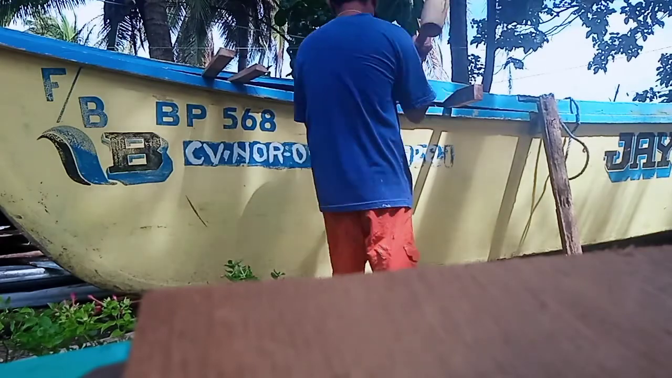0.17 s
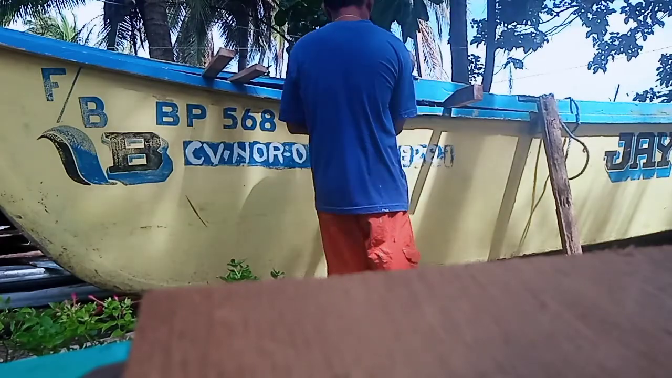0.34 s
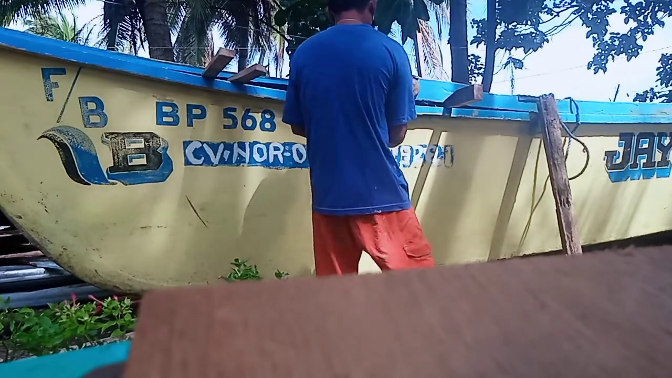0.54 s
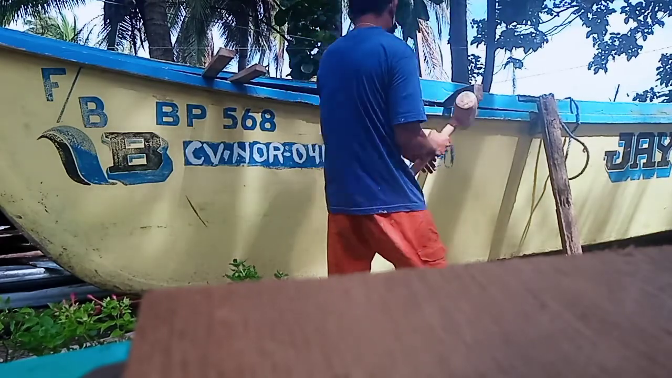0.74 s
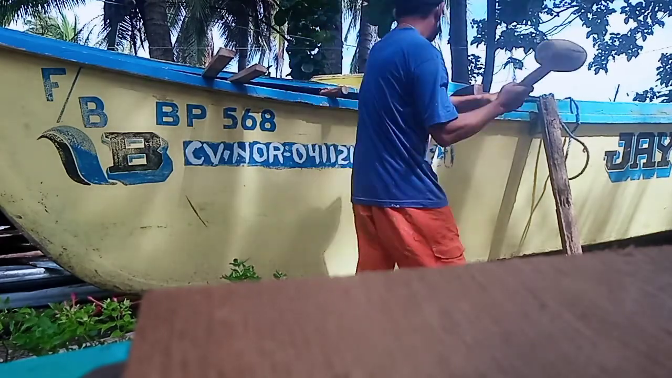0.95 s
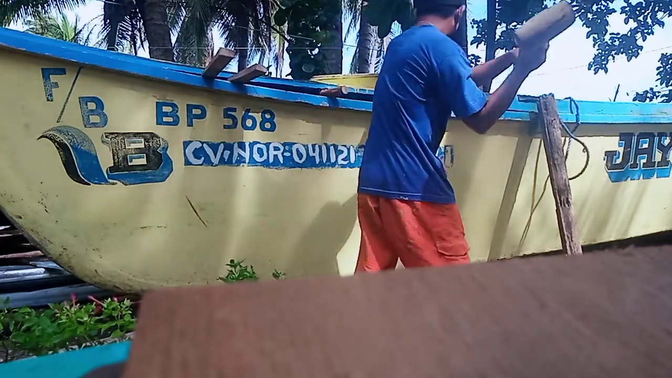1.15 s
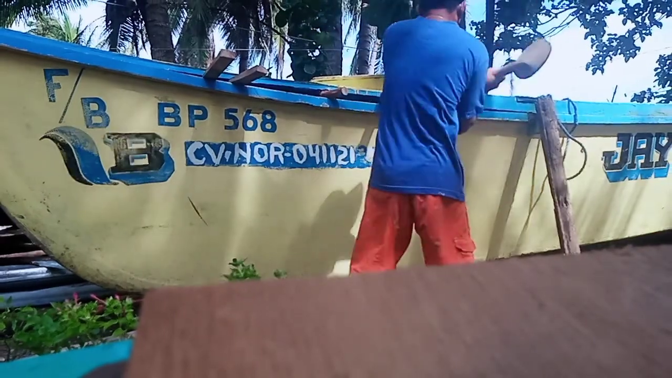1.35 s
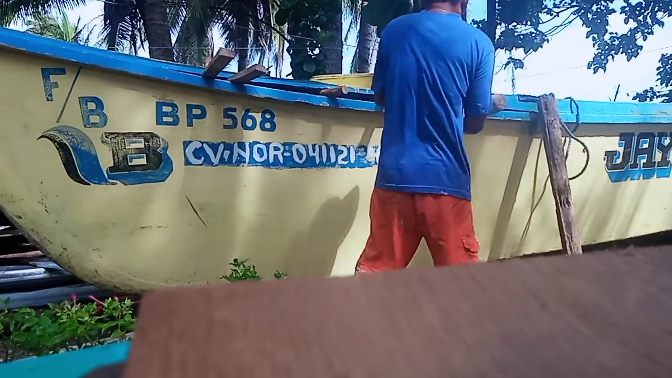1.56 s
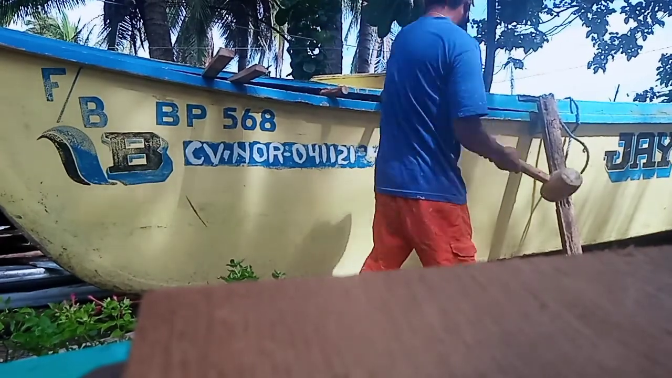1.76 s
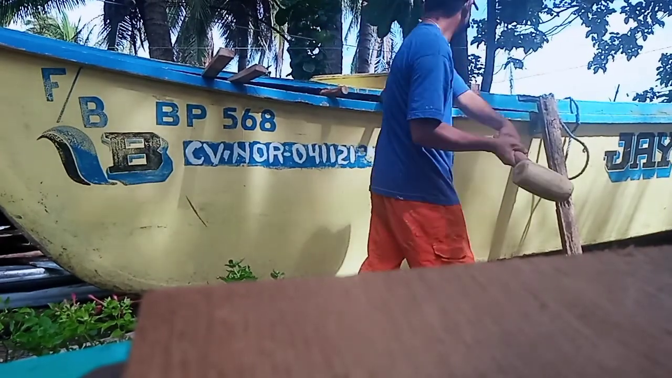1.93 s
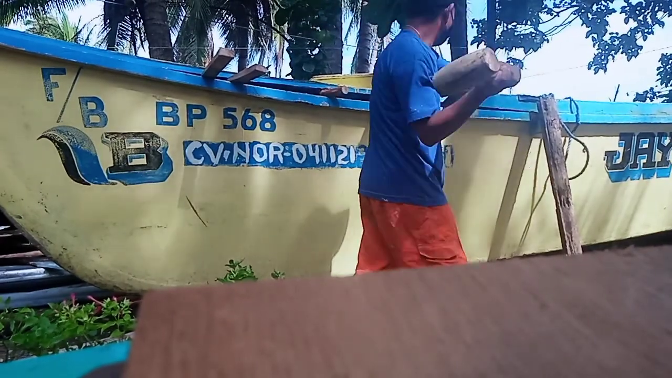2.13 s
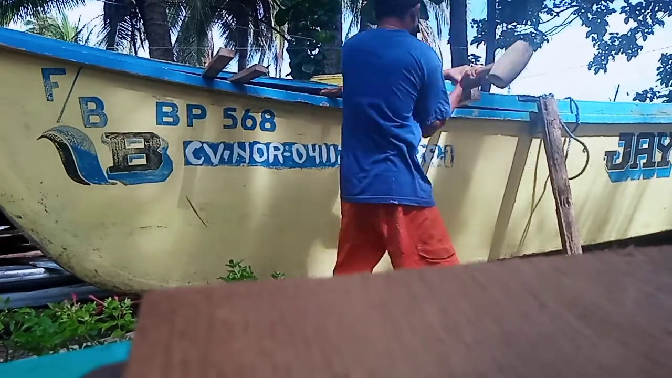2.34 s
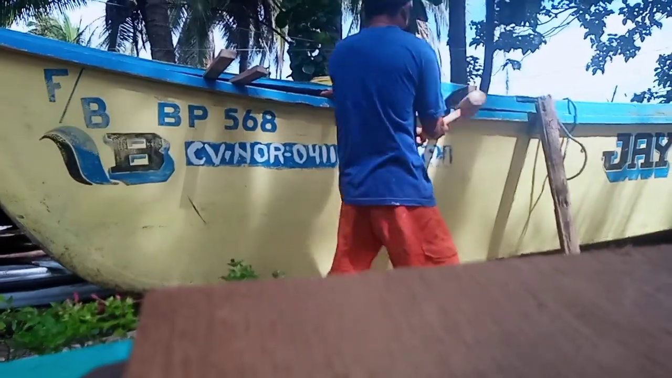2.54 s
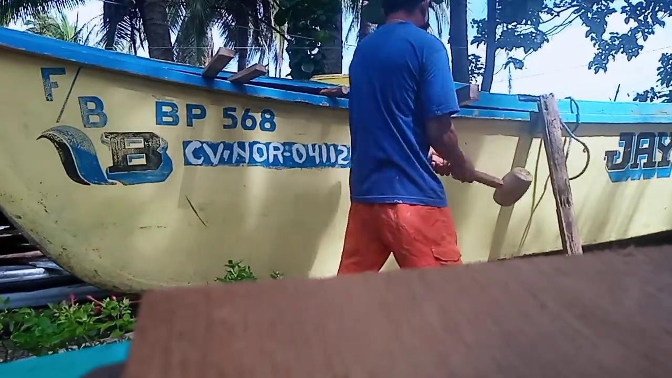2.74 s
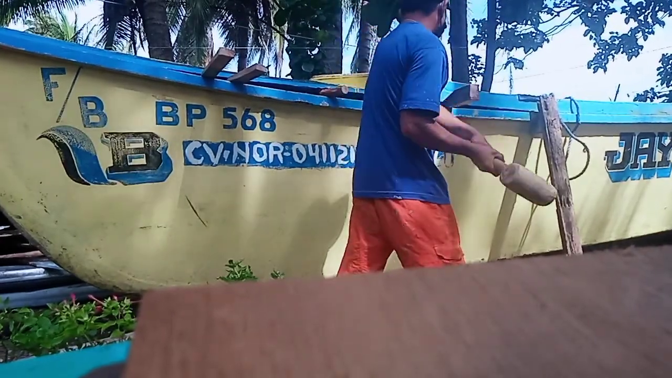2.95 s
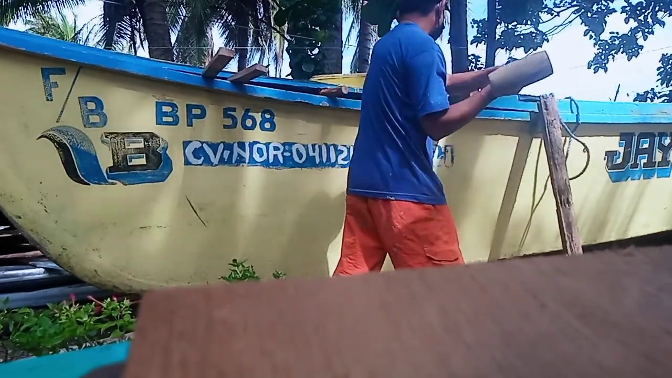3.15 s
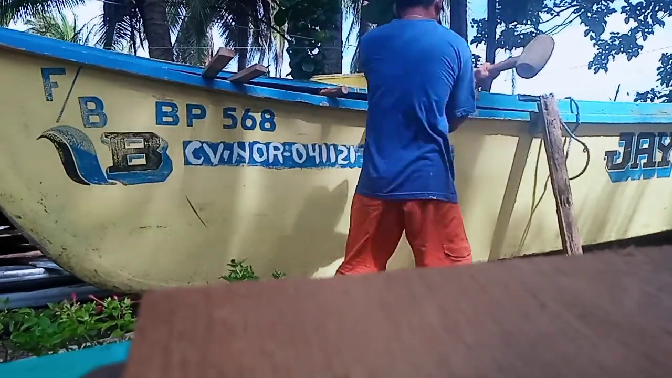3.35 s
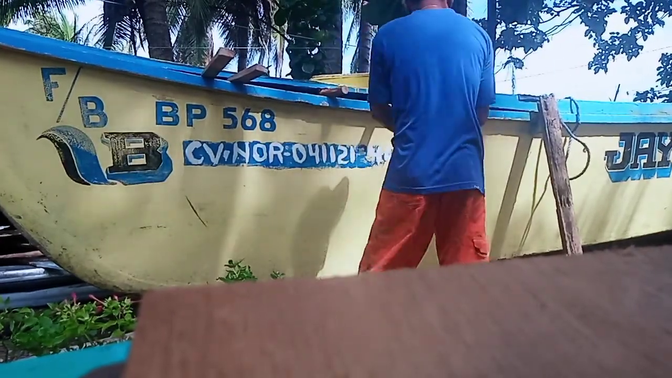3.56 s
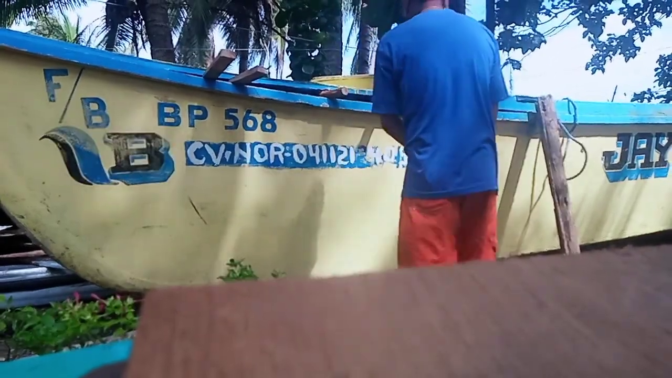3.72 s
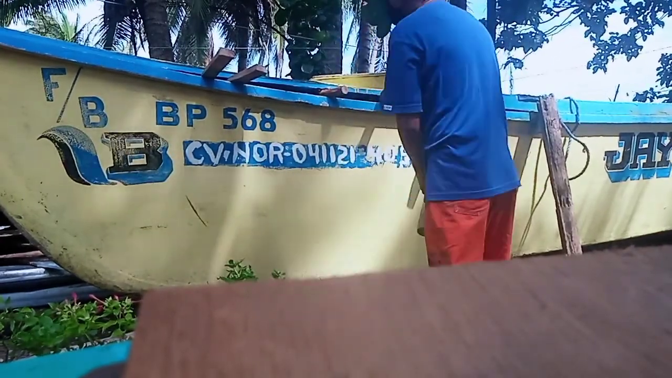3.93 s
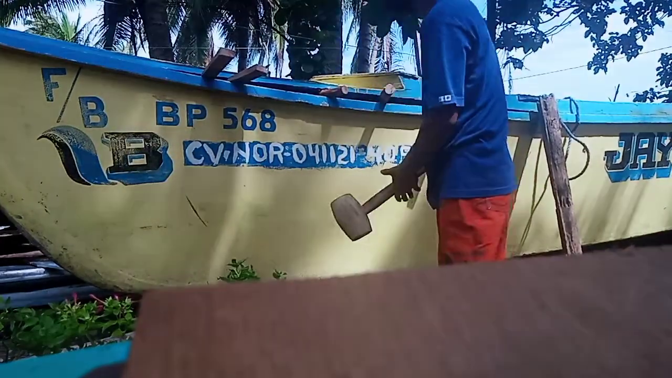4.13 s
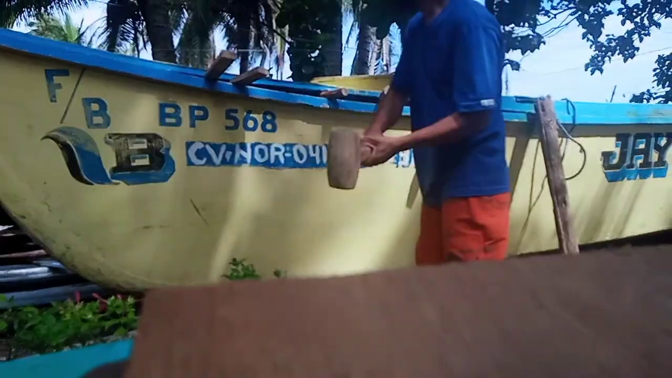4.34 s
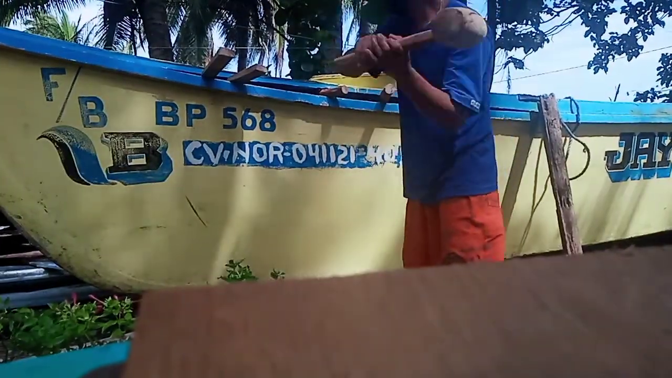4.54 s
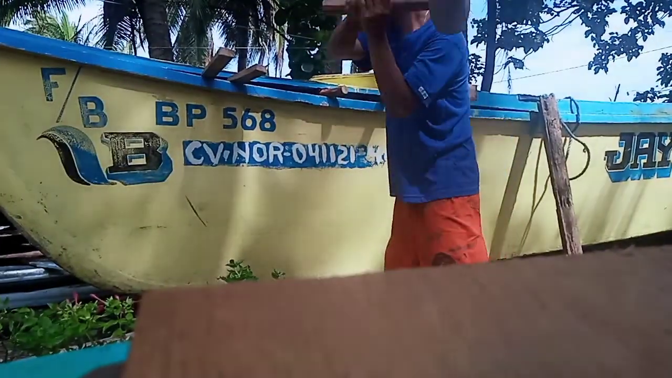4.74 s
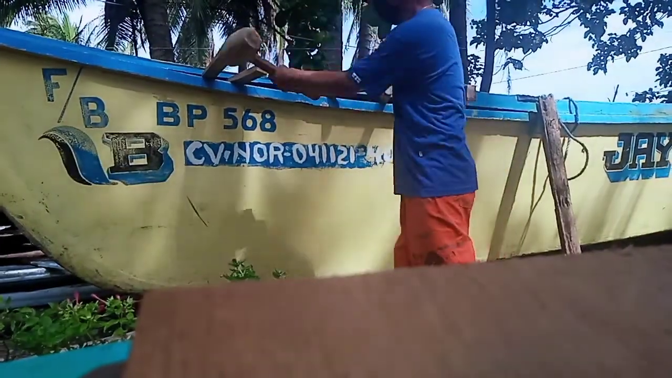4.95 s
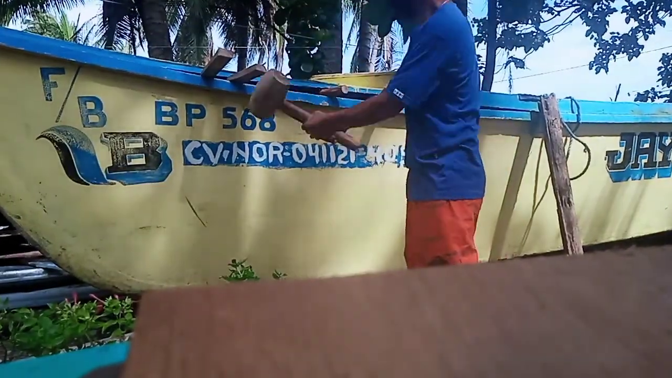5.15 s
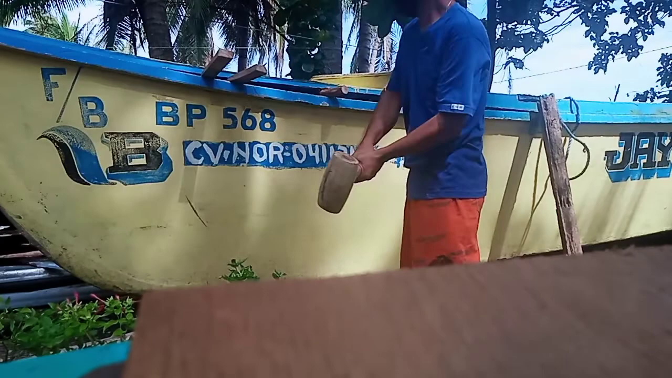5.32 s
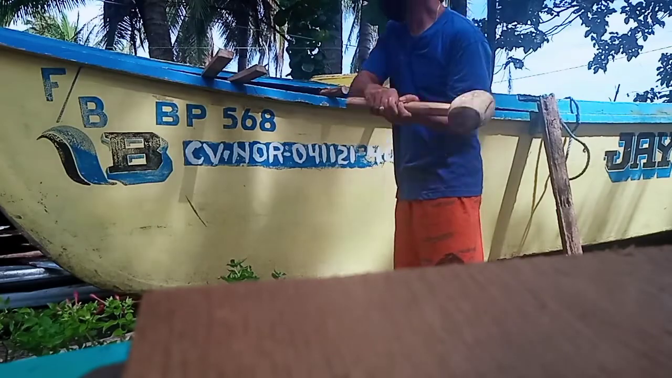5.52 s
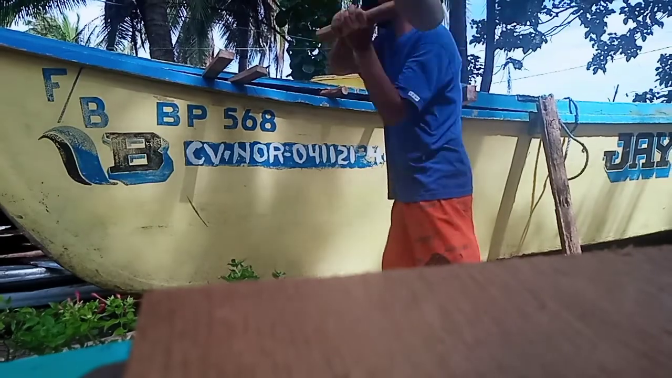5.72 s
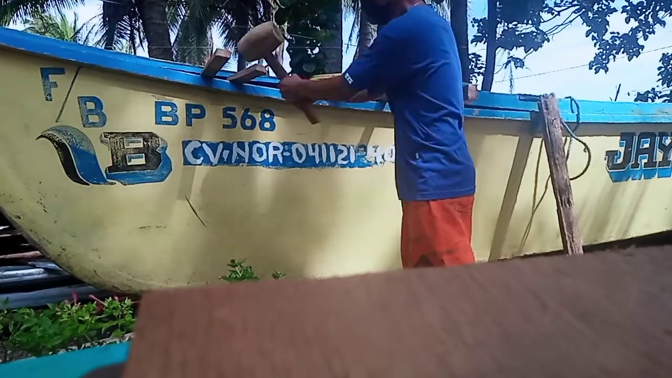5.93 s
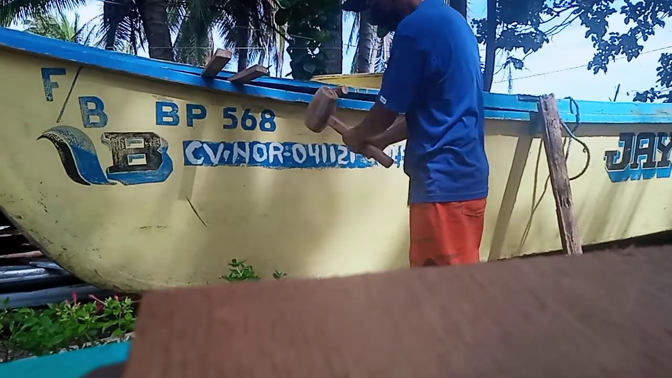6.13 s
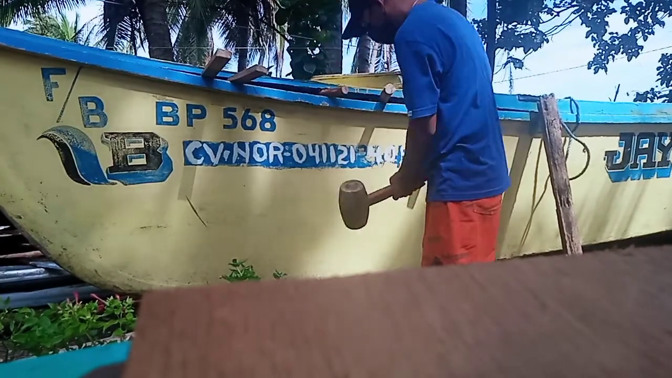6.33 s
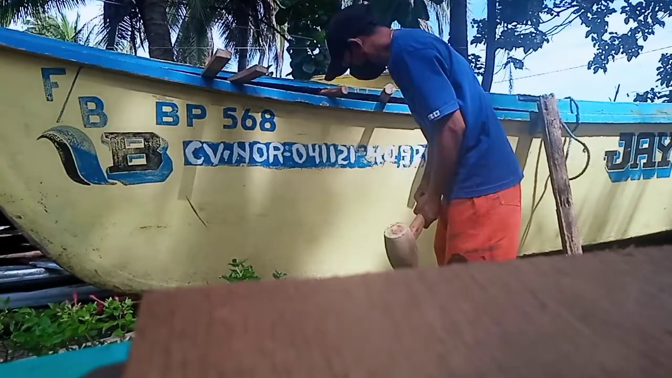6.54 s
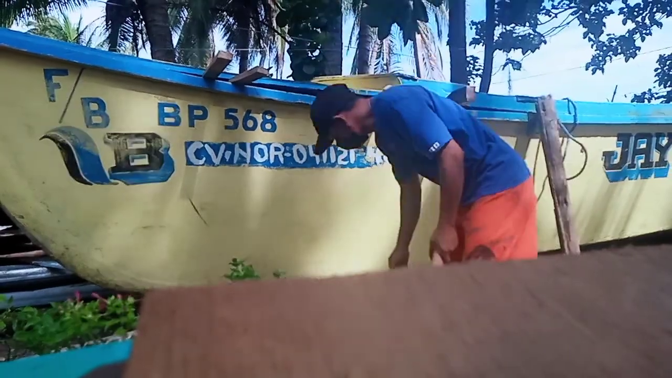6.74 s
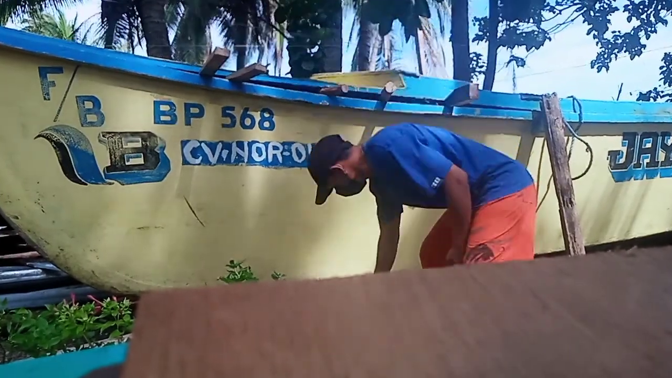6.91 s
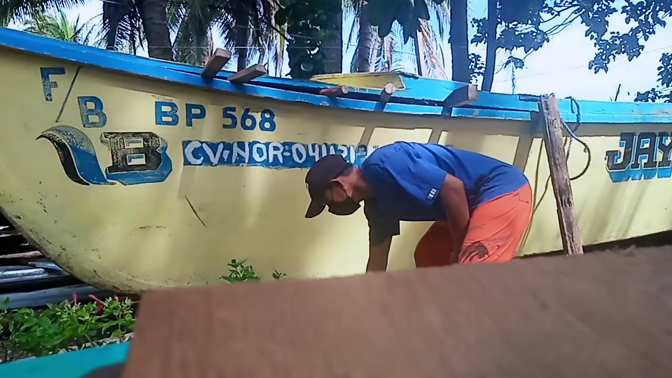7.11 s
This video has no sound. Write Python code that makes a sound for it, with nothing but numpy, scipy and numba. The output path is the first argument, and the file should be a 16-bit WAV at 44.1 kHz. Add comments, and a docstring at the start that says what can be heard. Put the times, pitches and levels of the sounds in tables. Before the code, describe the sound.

Six heavy mallet blows on a boat's wooden side, four in steady rhythm, a longer pause, then two more. Hard, noisy cracks dominate, followed by short plank resonance, low hull ring and chattering boards. Quiet bird chirps, faint distant tones, a shoe scuff and a small metallic clink fill the gaps. Dry outdoor mono sound with low rumble, the loud hits limited and slightly clipped.

```python
"""A steady outdoor hum and a small bird's chirp come first, then a heavy wooden mallet strikes a plywood boat hull.
Of six blows in an open yard, the first four move back towards amidships and the last two fall at the bow.
Each is a noisy crack and a knock of short planking modes, a low boom, slow hull modes and rattling noise bands,
with a dull echo from a far wall. Birds and distant tones are gliding sines; shoes, clothes and hum are shaped noise;
loose gear rings once. The recorder's limiter ducks loud peaks, and what still overshoots is rounded off."""
import sys
import numpy as np
from scipy import signal
from scipy.fft import rfft, irfft, next_fast_len
from scipy.io import wavfile
from scipy.ndimage import uniform_filter1d
from numba import njit

SR = 44100
rng = np.random.default_rng(int(sys.argv[2]) if len(sys.argv) > 2 else 0)


def dump_mix(stems):
    """Bounce the given channels to the path in sys.argv[1] as a 16-bit WAV at rate SR."""
    frames = np.atleast_2d(stems).T  # one column per channel
    limited = np.clip(frames, -1, 1)  # hard clip at full scale
    pcm = np.round(limited * 32767).astype(np.int16)
    wavfile.write(sys.argv[1], SR, pcm)


N = 316505  # length of the scene [samples]
T = np.arange(int(1.3 * SR)) / SR  # time within one short sound [s]

# In all spectra and mode lists the levels are relative: they set the balance inside one sound.

# outdoor background: spectrum (frequency [Hz], density [dB per Hz])
YARD_SPECTRUM = [(30, -17), (60, -13.5), (90, -5.5), (135, 1.5), (220, -9), (420, -19), (800, -16),
                 (1250, -14.5), (2300, -21.5), (3900, -25.5), (5500, -49.5), (7300, -50), (9500, -66.5),
                 (15000, -72)]
# outdoor background: slow level changes (time [s], level [dB])
YARD_LEVEL = [(0, -40), (1.3, -38), (2.3, -39), (4.3, -41.5), (5.6, -40), (7.1, -39)]

# a bird's quick falling chirps (time [s], relative level [dB])
CHIRP_CALLS = [(0.0, -47), (0.3, -46), (0.628, -48), (0.917, -46), (1.34, -50), (6.19, -50), (6.47, -53)]
# one such chirp (length [s], start pitch [Hz], end pitch [Hz])
CHIRP_NOTE = (.1, 4780, 3800)
# a high rising call (time [s], relative level [dB])
RISING_CALLS = [(.72, -60), (1.81, -65)]
# one rising note (length [s], start pitch [Hz], end pitch [Hz])
RISING_NOTE = (.14, 5850, 7100)
# thin, nearly level peeps from far off (time [s], relative level [dB])
PEEP_CALLS = [(1.24, -60), (1.35, -58), (2.02, -67), (2.37, -67), (2.69, -72), (3.02, -69), (3.38, -69),
              (4.52, -68), (5.37, -70)]
# one peep (length [s], start pitch [Hz], end pitch [Hz])
PEEP_NOTE = (.13, 5380, 5220)
# faint, drawn-out distant tones (time [s], length [s], pitch [Hz], relative level [dB])
DISTANT_TONES = [(2.1, .26, 1232, -42.5), (3.19, 0.26, 1860, -41), (3.72, 0.23, 1666, -39.5)]
NOTE_SPREAD = 0.011  # random spread between a bird's notes [share of the pitch]
TONE_WAVER = 0.022  # [share of the pitch]

# ringing modes of a piece of loose gear (frequency [Hz], time to fall 60 dB [s], level [dB])
CLINK_MODES = [(457, 0.25, -4.5), (930, 0.21, 3.5), (1190, .2, -6), (1620, 0.7, -8.5), (1945, 0.53, -3.5),
               (2070, 0.48, -7)]
CLINK_S, CLINK_DB = 3.862, -36.5  # when it is nudged [s], how loudly it clinks [dB]

# shoes scuffing the ground (time [s], level [dB])
STEP_TIMES = [(3.02, -37), (3.85, -38.5)]
# spectrum of a scuff (frequency [Hz], density [dB per Hz])
STEP_SPECTRUM = [(200, -29), (600, -3.5), (1050, 3), (2000, -5.5), (3500, -20), (5500, -41), (8000, -46),
                 (15000, -66)]
# rustling clothes (time [s], length [s], level [dB])
RUSTLE_TIMES = [(1.831, .1, -53), (4.125, 0.1, -54.5), (4.761, 0.085, -42), (6.688, 0.41, -55)]
# spectrum of a rustle (frequency [Hz], density [dB per Hz])
RUSTLE_SPECTRUM = [(1000, -30), (2300, -14), (3000, 1), (4000, -4.5), (5300, -21.5), (7500, -20.5),
                   (10000, -38), (15000, -41)]
STEP_S, RUB_RISE_S = 0.088, 0.015  # length of a scuff [s], build-up of a scuff or rustle [s]

# mallet blows (time [s], force [dB], crack [dB], rattle tilt [dB per octave], buzz [dB],
# spot [0 amidships, 3 and beyond at the bow])
MALLET_BLOWS = [(0.4227, -4.5, 0.5, 0.1, 0.5, 2), (1.487, -0.5, 4, 0.6, 5.5, 1.67),
                (2.473, 0.2, -1, -0.84, -2, 1), (3.4904, 0, 0, -0.5, -0.5, 0),
                (5.001, -3, 2.5, 1.07, 0.5, 3), (5.961, -4.5, 0.5, 0.1, 1, 3.5)]
# the contact crack (frequency [Hz], density [dB per Hz])
CRACK_SPECTRUM = [(150, -11), (500, 3.5), (1100, 9), (2200, -8.5), (3900, -11), (5000, -27), (8000, -51.5),
                  (15000, -69.5)]
# planking modes under the mallet (frequency [Hz], time to fall 60 dB [s], levels at spots 0, 1, 2, 3 [dB each])
PLANK_MODES = [(254, 0.1, -4.5, -9, -3.5, -38), (316.4, 0.12, -14, -14.5, -13, -6.5),
               (424, .06, -10.5, -6.5, -21, -23), (492, 0.11, -10, -8.5, -7, -5),
               (544, .06, -24, -27, 1, -6.5), (672.5, 0.045, -8, -23.5, -31, 3.5),
               (779.4, 0.098, -23, -38, -6.5, -8), (907, 0.065, -4, -0.5, -2.5, -1.5),
               (963, 0.08, -18, -2.5, -8, -8), (1027.5, 0.055, 1, 3.5, -5.5, -3.5),
               (1128, 0.033, -4, -3.5, 2.5, -5), (1239, 0.09, -2, -4.5, -15, -13),
               (1372, 0.037, -6, -13, -28.5, -26), (1552, 0.082, -1, -29, -11.5, -14),
               (1740, 0.091, -21, -27, -9, -16), (1785, 0.13, -27, -26, -17, -18),
               (1854, 0.048, -5.5, -17.5, -10, -21), (2820, 0.048, -39, -25, -26.5, -13),
               (3330, 0.025, -17, -4.5, -22.5, -29), (3450, 0.02, -14, -17.5, -17, -5.5)]
# slow modes of the whole hull (frequency [Hz], time to fall 60 dB [s], levels at spots 0, 1, 2, 3 [dB each])
HULL_MODES = [(60.1, 1, -46, -40, -30.5, -20), (65.96, 1, -33, -24, -27, -28.5),
              (80, 0.36, -29, -25, -19.5, -37), (89.1, 0.5, -29, -19, -25, -23.5),
              (107.9, 0.78, -21.5, -34, -25.5, -35), (117.5, 0.37, -23, -24, -23, -37),
              (130.6, 0.23, -23, -18, -14.5, -22), (157.6, 0.49, -26, -19, -14.5, -43),
              (181.4, 0.39, -16, -20, -29, -33), (217.3, 0.24, -18, -19, -13.5, -37),
              (275.6, 0.42, -28, -27.5, -24, -28.5), (474, 0.22, -37, -33.5, -25, -13.5)]
# dense rattle of ribs and boards (frequency [Hz], density [dB per Hz])
RATTLE_SPECTRUM = [(40, -21), (90, -5), (160, -3.5), (260, -9.5), (400, -14), (650, -12), (900, -14.5),
                   (1250, -16.5), (1900, -19), (2300, -26), (3400, -27), (4400, -37), (5300, -53),
                   (7500, -54.5), (10000, -75.5), (15000, -74)]
# how long it rattles, before the length factor (frequency [Hz], time to fall 60 dB [s])
RATTLE_DECAY = [(80, 0.68), (250, 0.27), (600, 0.27), (1300, 0.4), (3500, 0.41), (10000, 0.45)]
BOOM_NODE_SPOT = 3.06  # the boom is fullest amidships and vanishes at this spot, where the bow is stiff
HULL_DB = 6.9
# the rattle's gain ignores the force, but a harder blow rattles for longer
RATTLE_DB, RATTLE_LENGTH, RATTLE_LENGTH_PER_DB = -7.5, 1.084, 0.026  # [dB], [factor], [factor per dB of force]
BUZZ_HZ, BUZZ_OCTAVES = 3100, .33  # a loose board's buzz within the rattle: centre [Hz], width [octaves]
WALL_S, WALL_DB = .3, -23.5  # the far wall's echo: delay [s], level [dB]

CUT_HZ = 15700  # the finished sound has almost nothing above this [Hz]


def undb(db):
    """Turn decibels into a gain."""
    return 10 ** (np.asarray(db) / 20)


def unit(x):
    """Scale to an average (rms) strength of 1."""
    return x / np.sqrt(np.mean(x ** 2))


def add(out, s, x):
    """Mix x into out from time s [s] on."""
    i = max(int(s * SR), 0)
    out[i:i + len(x)] += x[:len(out) - i]


def at(points, hz):
    """Read a (frequency [Hz], value) table between its points, on a log-frequency axis."""
    f, value = np.transpose(points)
    return np.interp(np.log(hz + 1), np.log(f), value)


def bands(spectrum, size):
    """Shape noise to a spectrum and rms 1, then split it into overlapping bands: (centre [Hz], band) pairs."""
    hz = np.fft.rfftfreq(size, 1 / SR)
    white = rfft(rng.standard_normal(size))
    shaped = unit(irfft(white * undb(at(spectrum, hz)), size))
    noise = rfft(shaped)
    for centre in 28 * 2 ** np.arange(0, 9.6, .5):  # half-octave steps
        weight = np.maximum(1 - 2 * abs(np.log2((hz + 1) / centre)), 0)
        yield centre, irfft(noise * weight, size)


def walk(rate):
    """Make a random wander of rms 1 by smoothing about rate random steps per second."""
    k = int(SR / rate)
    steps = np.repeat(rng.standard_normal(N // k + 1), k)
    return unit(uniform_filter1d(uniform_filter1d(steps, k), k)[:N])


def fade(t60):
    """Exponential decay, 60 dB down after t60 [s]."""
    return np.exp(-np.log(1000) * T / t60)


def swell(s):
    """Smooth rise over about s seconds."""
    return 1 - np.exp(-(T / s) ** 2)


def ring(modes, spot, detune, turn):
    """Sum decaying sine modes; the struck spot sets their strengths, and each lags the last by turn cycles."""
    shifts = 1 + detune * rng.standard_normal(len(modes))
    total = np.zeros(len(T))
    for k, (hz, t60, *db) in enumerate(modes):
        strength = undb(np.interp(spot, np.arange(len(db)), db))
        wave = np.sin(2 * np.pi * (hz * shifts[k] * T - turn * k))
        total += strength * fade(t60) * wave
    return total


def scatter(x, t60):
    """Smear a sound over many small reflections, modelled as fading noise."""
    paths = rng.standard_normal(len(T)) * fade(t60)
    return signal.fftconvolve(x, paths / np.linalg.norm(paths))[:N]


def yard():
    """Distant rumble and hiss: all noise bands drift together and each flickers a little."""
    drift_db = .35 * walk(2)
    s, db = np.transpose(YARD_LEVEL)
    level_db = np.interp(np.arange(N) / SR, s, db) + drift_db
    hum = np.zeros(N)
    for _, band in bands(YARD_SPECTRUM, next_fast_len(N)):
        hum += band[:N] * undb(level_db + .5 * walk(14))
    return hum


def whistle(length, start_hz, end_hz, waver):
    """One gliding sine that swells and fades, its pitch wavering by a small share."""
    size = int(length * SR)
    hz = np.linspace(start_hz, end_hz, size) * (1 + waver * walk(600)[:size])
    return np.hanning(size) * np.sin(2 * np.pi * np.cumsum(hz) / SR)


def birds():
    """Each bird repeats its own gliding note; the trees smear these and the distant tones."""
    out = np.zeros(N)
    singers = ((CHIRP_CALLS, CHIRP_NOTE, .02), (RISING_CALLS, RISING_NOTE, .03), (PEEP_CALLS, PEEP_NOTE, .016))
    for calls, (length, start_hz, end_hz), waver in singers:
        for s, db in calls:
            pitch = 1 + NOTE_SPREAD * rng.standard_normal()
            add(out, s, undb(db) * whistle(length, pitch * start_hz, pitch * end_hz, waver))
    for s, length, hz, db in DISTANT_TONES:
        add(out, s, undb(db) * whistle(length, hz, hz, TONE_WAVER))
    return .45 * out + .5 * scatter(out, t60=.2)  # direct sound plus smear


def clink():
    """A small metal object is nudged and its modes ring briefly."""
    out = np.zeros(N)
    tones = ring(CLINK_MODES, 0, detune=0.0016, turn=0.45) * swell(0.0063)
    add(out, CLINK_S, undb(CLINK_DB) * tones)
    return out


def rub(spectrum, length, grain_db):
    """Friction noise that rises quickly and trails off; grain_db sets how unevenly it rubs."""
    noise = sum(band for _, band in bands(spectrum, len(T)))
    noise = noise * undb(grain_db * walk(250)[:len(T)])
    return unit(noise) * swell(RUB_RISE_S) * np.exp(-(T / length) ** 2)


def scuffs():
    """The worker shifts his feet and his clothes rustle: short bursts of friction noise."""
    out = np.zeros(N)
    for s, db in STEP_TIMES:
        add(out, s, undb(db) * rub(STEP_SPECTRUM, STEP_S, grain_db=0.0))
    for s, length, db in RUSTLE_TIMES:
        add(out, s, undb(db) * rub(RUSTLE_SPECTRUM, length, grain_db=2.0))
    return out


def knocking(crack_db, spot):
    """The mallet's contact crack and the planking modes it sets off, with two early returns."""
    crack = sum(band for _, band in bands(CRACK_SPECTRUM, len(T))) * fade(0.044) * swell(0.00086)
    planks = ring(PLANK_MODES, spot, detune=0.0084, turn=0.3574) * swell(0.00096)
    knock = undb(4.5) * planks + undb(crack_db + 5.5) * crack
    # it comes back once from close by, then as a blur from the trees and sheds
    blur = scatter(knock, t60=0.38)[:len(T)] * swell(0.037)
    add(knock, .019, undb(-13.5) * knock)
    add(knock, .08, undb(-27) * blur)
    return knock


def bloom(hz, glide, peak_s, sharpness, db):
    """A low tone that builds up to peak_s and dies away, its pitch sinking by a share glide per second."""
    rise = T / peak_s
    cycles = hz * np.cumsum(np.exp(-glide * (T - peak_s))) / SR
    return undb(db) * (rise * np.exp(1 - rise)) ** sharpness * np.sin(2 * np.pi * cycles)


def booming(spot):
    """The broad panel swings out first, and the hollow of the hull swells after it."""
    panel = bloom(hz=133.5, glide=11.0, peak_s=0.0143, sharpness=8.8, db=12.5)
    hollow = bloom(hz=135.55, glide=1.0, peak_s=0.095, sharpness=6.0, db=-13.0)
    return np.cos(np.pi / 2 * spot / BOOM_NODE_SPOT) * (panel + hollow)


def rattling(force_db, tilt_db, buzz_db):
    """Ribs and boards chatter as noise bands, each with its own decay, and a far wall answers."""
    length = RATTLE_LENGTH + RATTLE_LENGTH_PER_DB * force_db
    rattle = np.zeros(len(T))
    for hz, band in bands(RATTLE_SPECTRUM, len(T)):
        tilt = tilt_db * np.log2(hz / 1000)
        buzz = buzz_db * np.exp(-.5 * (np.log2(hz / BUZZ_HZ) / BUZZ_OCTAVES) ** 2)
        rattle += band * fade(length * at(RATTLE_DECAY, hz)) * undb(tilt + buzz)
    rattle = rattle * swell(0.0053)
    rattle = rattle * undb(0.5 * walk(200)[:len(T)])  # the boards chatter unevenly
    # the wall returns a faster-fading, dull copy
    dull = signal.butter(2, [180, 700], "bandpass", fs=SR, output="sos")
    thud = signal.sosfilt(dull, rattle * fade(0.8) * swell(0.0064))
    add(rattle, WALL_S, undb(WALL_DB) * thud)
    return rattle


def blow(force_db, crack_db, tilt_db, buzz_db, spot):
    """One blow joins knock, boom and hull ring, which follow the force, to the rattle."""
    knock = knocking(crack_db, spot)
    boom = booming(spot)
    hull = ring(HULL_MODES, spot, detune=0.0073, turn=0.501) * swell(0.016)
    rattle = rattling(force_db, tilt_db, buzz_db)
    return undb(force_db) * (knock + boom + undb(HULL_DB) * hull) + undb(RATTLE_DB) * rattle


def mallet():
    """All the blows in turn, their ringing tails overlapping."""
    out = np.zeros(N)
    for s, *stroke in MALLET_BLOWS:
        add(out, s, blow(*stroke))
    return out


def scene():
    """The boatyard on one channel: all sources added together."""
    return (yard() + birds() + clink() + scuffs() + mallet())[None]


@njit
def recover(cut, step):
    """Hold each gain cut [dB] and let it go by a fixed step a sample."""
    out = cut.copy()
    for i in range(1, len(cut)):
        out[i] = max(cut[i], out[i - 1] - step)
    return out


def limiter(x, threshold_db=-5, depth_db=9.5, release_db_per_s=90, ahead_s=0.02):
    """Look-ahead limiter of limited depth: it ducks just before a peak and recovers during the tail."""
    cut = np.clip(20 * np.log10(abs(x) + 1e-9) - threshold_db, 0, depth_db)
    cut = uniform_filter1d(recover(cut, release_db_per_s / SR), size=300)
    early_cut = np.interp(np.arange(N) + ahead_s * SR, np.arange(N), cut)
    return x * undb(-early_cut)


def record(dry):
    """The microphone sheds the deepest bass, the limiter ducks, overshoots are clipped and the top is cut."""
    x = signal.sosfilt(signal.butter(2, 38, "highpass", fs=SR, output="sos"), dry[0])
    x = limiter(x)
    x = x / (1 + (x / .93) ** 8) ** (1 / 8)  # clip with slightly rounded corners
    return signal.sosfilt(signal.ellip(8, .2, 70, CUT_HZ, fs=SR, output="sos"), x)[None]


dry = scene()
out = record(dry)
dump_mix(out)
```